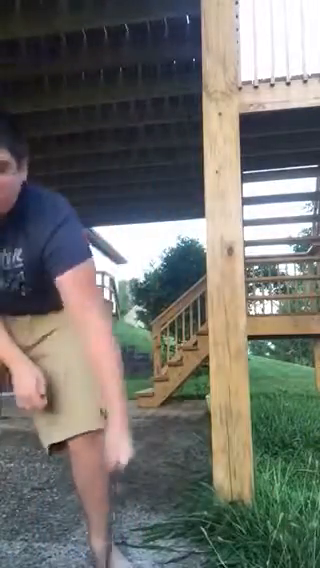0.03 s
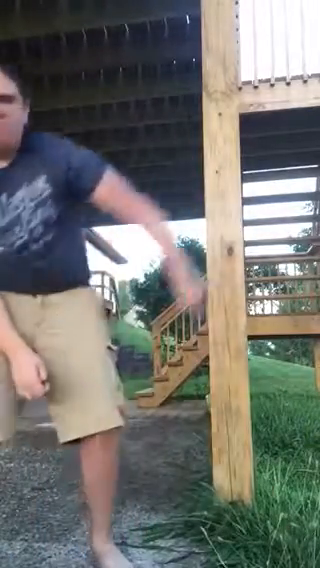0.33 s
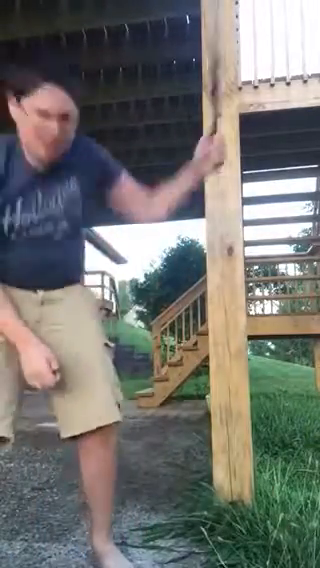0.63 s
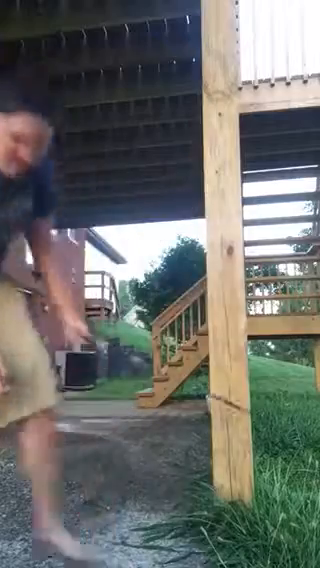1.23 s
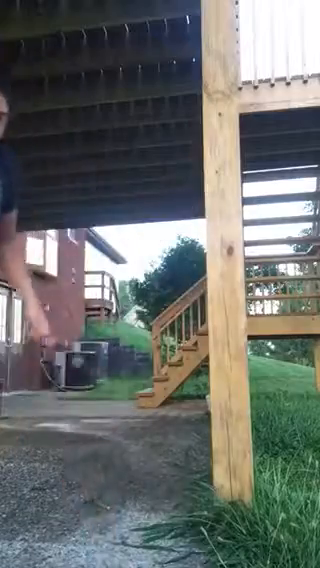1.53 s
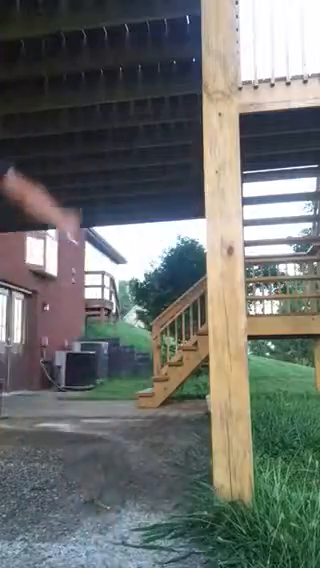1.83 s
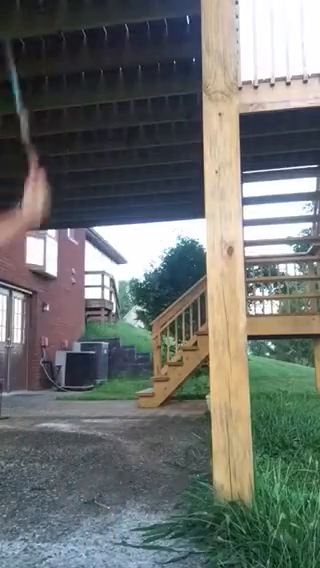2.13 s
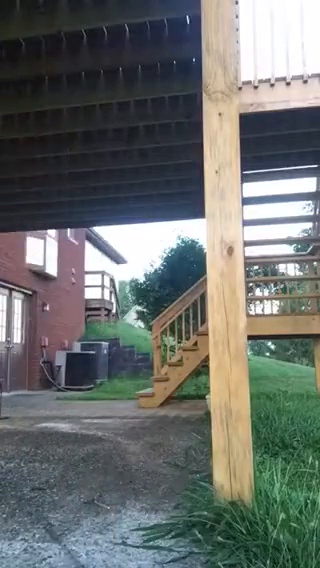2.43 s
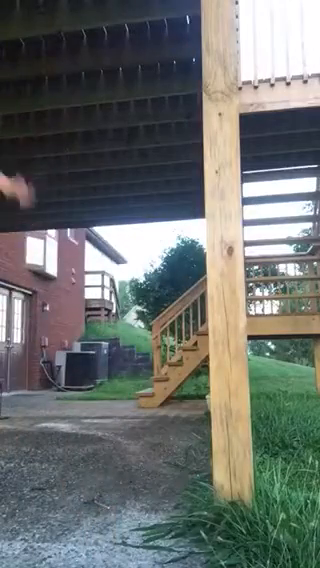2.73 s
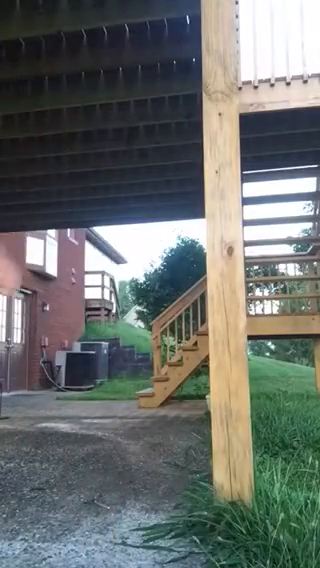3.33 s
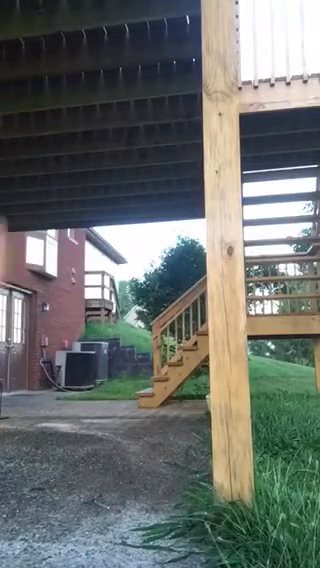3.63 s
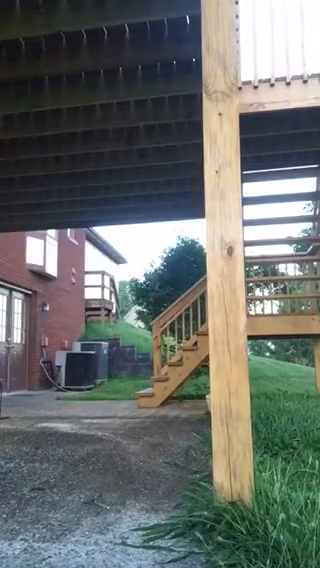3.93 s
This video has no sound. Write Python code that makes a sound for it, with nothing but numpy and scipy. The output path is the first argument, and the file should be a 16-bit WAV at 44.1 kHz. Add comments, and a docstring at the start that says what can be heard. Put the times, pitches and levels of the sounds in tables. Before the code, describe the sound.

A thin rod cracks against a wooden post five times, each hit led by a brief whoosh. The first is loudest, with a woody ring. Short echoes bounce under a deck while an air conditioner hums faintly.

```python
"""A brief whoosh ends in a sharp crack: a thin rod strikes a wooden post under a deck, five times in all.
The first blow lands squarely and rings the post's modes; ground, joists and house wall reflect each crack.
The moving rod stirs the air, and faint handling ticks fall between swings. Behind them an air
conditioner hums in the yard, with a thin shrill and a light breeze. A limiter ducks after loud cracks."""
import sys
import numpy as np
from scipy import signal
from scipy.fft import rfft, irfft, next_fast_len
from scipy.io import wavfile
from scipy.ndimage import uniform_filter1d, minimum_filter1d, map_coordinates

SR = 44100
rng = np.random.default_rng(int(sys.argv[2]) if len(sys.argv) > 2 else 0)


def log_audio(samples):
    """Write samples as a 16-bit WAV file to the path given in sys.argv[1]."""
    # one column per channel
    frames = np.atleast_2d(samples).T
    # limit to full scale, then quantise
    limited = np.clip(frames, -1, 1)
    pcm = np.round(limited * 32767).astype(np.int16)
    wavfile.write(sys.argv[1], SR, pcm)


N = 176400

# The five blows: t/s, crack level/dB, echo level/dB re crack, post ring level/dB, knock level/dB,
# whoosh level/dB, tip hiss level/dB re whoosh
BLOWS = [(0.0816, 1, -7, 2.5, -3, -38, 3), (.930, -8, -12.5, -46, -19.5, -26.5, -17),
         (2.366, -5.5, -1.5, -42, -39, -27.5, -13), (3.073, -4, -1.5, -35, -31, -25, -15.5),
         (3.819, -4.5, -0.5, -42, -30, -28, -12)]


def cracks():
    """Impact noise: a burst of spiky micro-contacts, whose early reflections add to it in power."""
    contact_spectrum = [(88, -44), (150, -3), (445, -12), (681, -13.5), (912, -12.5), (1060, -4.5),
                        (1270, -31), (1870, -9), (2760, -3), (3350, -4), (3690, -4.5), (4930, -2),
                        (5990, 3), (6470, 1.5), (7000, -1), (12800, -3), (15500, -5.5)]  # f/Hz, relative spectral level/dB
    reflections = [(0.0123, -0.5), (0.0226, -3), (.039, -11)]  # from deck and walls: delay t/s, relative level/dB
    spikes = rng.standard_normal(N)
    spikes *= np.exp(0.4 * rng.standard_normal(N // 8 + 1).repeat(8)[:N])  # a new strength every 8 samples
    grain = unit(filtered(spikes, lambda hz: amp(along(contact_spectrum, hz)) * rod_colour(hz)))
    power = np.zeros(N)
    for s, db, echo_db, *_ in BLOWS:
        power += (amp(db) * slap(s)) ** 2
        for delay, loss_db in reflections:
            power += (amp(db + echo_db + loss_db) * slap(s + delay)) ** 2
    return grain * np.sqrt(power)


def slap(s, hold_s=0.0043, t60_s=0.026):
    """Contact time: the envelope holds while the rod slaps along its length, then falls as it lets go."""
    t = clock() - s
    return (t >= 0) * amp(-60 * np.maximum(t - hold_s, 0) / t60_s)


def rod_colour(hz, half_width_hz=20):
    """Resonance: narrow peaks at the ringing partials, and one notch, colour every crack."""
    partials = [(2000, 8), (2860, 6), (3645, 6), (4527, 6), (5932, 4.5), (6191, -10.5), (6683, 2),
                (6972, 2.5), (7204, 9), (7597, 4), (8360, 3.5), (8660, 12), (8847, 7), (9147, 11),
                (9877, 6), (11811, 10)]  # f/Hz, relative level/dB
    return 1 + sum((amp(db) - 1) / (1 + ((hz - centre) / half_width_hz) ** 2) for centre, db in partials)


def deck_reverberation(gain_db=-2.5, rise_s=0.0021):
    """Reverberation: a diffuse field decays between joists and ground, the treble first."""
    bass_spectrum = [(100, -42), (600, -12)]  # f/Hz, relative spectral level/dB
    upper_spectrum = [(710, -44), (1200, -18), (1460, -23), (1880, -12), (2830, -2), (3460, -6.5),
                      (5040, -9), (6110, -1), (7570, -9), (9680, -6.5), (15500, -14)]  # f/Hz, relative spectral level/dB
    decay_times = [(300, 0.34), (3000, 0.31), (7000, 0.28), (15000, 0.23)]  # f/Hz, T60/s
    out = np.zeros(N + SR)
    diffuse = unit(filtered(noise(bass_spectrum + upper_spectrum), rod_colour))
    for (s, db, echo_db, *_), piece in zip(BLOWS, np.array_split(diffuse, len(BLOWS))):
        hz, t, spectra = signal.stft(piece, SR, nperseg=256)
        decay = amp(-60 * t / along(decay_times, hz)[:, None])
        tail = signal.istft(spectra * decay, SR)[1]
        rise = 1 - np.exp(-np.arange(len(tail)) / SR / rise_s)
        out[round(s * SR):][:len(tail)] += amp(db + echo_db + gain_db) * rise * tail
    return out[:N]


def post(lag_s=0.00296, rise_s=0.0021, knock_t60_s=0.17):
    """Free vibration: damped bending modes ring and dense upper modes knock, most on a square blow."""
    modes = [(362, -10, .24), (709, 0, .23), (963, -16, .24), (42, -7, .08), (104, -16, .2),
             (215, -16, .15), (253, -11, .14), (290, -5, .1), (535, -24, .25), (770, -12, .08),
             (861, -10, .09), (925, -13, .1)]  # f/Hz, relative level/dB, T60/s
    knock_spectrum = [(100, 11), (400, 0.5), (1000, -5.5), (1400, -14), (2000, -2), (3000, 3), (5000, -13),
                      (15000, -35)]  # f/Hz, relative spectral level/dB
    out, knocks = np.zeros(N + SR), np.zeros(N)
    t = np.arange(SR // 2) / SR
    ring = sum(amp(db - 60 * t / t60) * np.sin(2 * np.pi * hz * t) for hz, db, t60 in modes)
    ring *= 1 - np.exp(-t / rise_s)
    for s, _, _, ring_db, knock_db, *_ in BLOWS:
        out[round((s + lag_s) * SR):][:len(t)] += amp(ring_db) * ring
        knocks += amp(knock_db) * struck(s, rise_s, knock_t60_s)
    return out[:N] + knocks * noise(knock_spectrum)


def swings(lead_s=0.0078, rise_s=0.026, fall_s=0.01, speed_up_s=0.042):
    """Flow noise: air rushes round the rod, louder and higher as it speeds up; the tip adds a hiss."""
    slow_spectrum = [(100, -12), (300, -6), (600, 11), (900, -7), (1300, -21.5), (2200, -8), (5000, -58),
                     (15000, -40)]  # f/Hz, relative spectral level/dB
    fast_spectrum = [(100, -53), (400, -15), (620, -0.5), (800, 6), (1080, 0.5), (1400, -21.5),
                     (2200, -15.5), (4000, -26.5), (15000, -28.5)]  # f/Hz, relative spectral level/dB
    tip_spectrum = [(600, -27), (1200, -3), (1700, -2), (2400, -4.5), (3500, -12.5), (8000, -17),
                    (15000, -18)]  # f/Hz, relative spectral level/dB
    slow, fast, tip = noise(slow_spectrum), noise(fast_spectrum), noise(tip_spectrum)
    out = np.zeros(N)
    for s, *_, db, tip_db in BLOWS:
        t = clock() - s + lead_s
        swell = np.exp(-np.abs(t / np.where(t < 0, rise_s, fall_s)) ** 1.25)
        speed = np.clip(1 + t / speed_up_s, 0, 1)
        out += amp(db) * swell * (np.sqrt(1 - speed) * slow + np.sqrt(speed) * fast)
        out += amp(db + tip_db) * gaussian(s - 0.019, half_width_s=0.019) * tip
    backswing = gaussian(2.74, half_width_s=0.06) * band(3050, octaves=0.25)
    return out + amp(-49.5) * backswing


def thud(s=0.93, db=-24.5, hz=103):
    """Damped oscillation: one low sinusoid makes a dull bump that coincides with the second blow."""
    return amp(db) * struck(s, rise_s=0.005, t60_s=0.22) * np.sin(2 * np.pi * hz * (clock() - s))


def handling_ticks(rise_s=0.0012):
    """Light impacts: handling the rod excites faint clicks and one woody tap, as decaying noise bands."""
    ticks = [(1.735, -47, 10100, 0.54), (3.315, -48, 14000, .3), (3.466, -47, 14000, 0.36),
             (3.622, -34, 9500, 0.26), (3.717, -39, 12000, 0.42)]  # t/s, level/dB, centre f/Hz, half-width/octaves
    tap_modes = [(1620, -4), (2180, -4), (2750, 0.5), (4200, -7), (6200, 0)]  # f/Hz, relative level/dB
    clicks = sum(amp(db) * struck(s, rise_s, t60_s=0.2) * band(hz, width) for s, db, hz, width in ticks)
    wood = unit(sum(amp(db) * band(hz, octaves=0.13) for hz, db in tap_modes))
    tap = amp(-36.5) * struck(3.623, rise_s, t60_s=0.29) * wood
    return clicks + tap


def air_conditioner(hum_hz=53.64, drift=0.0032):
    """Harmonic series over flow noise: the machine's wavering hum, with the rush of fan and outdoor air."""
    harmonics = [(1, -33), (2, -49.5), (3, -53.5), (4, -54), (5, -52.5), (8, -55), (12, -60)]  # harmonic number, level/dB
    air_spectrum = [(76, -14), (130, -12), (156, -3.5), (183, -5.5), (219, 4.5), (242, 0), (273, 1),
                    (289, -1), (391, -5.5), (440, 1.5), (487, -5.5), (583, -2.5), (698, -3), (819, -7.5),
                    (905, -5), (1250, -19.5), (1650, -15.5), (1900, -16), (2670, -14), (3070, -19),
                    (4860, -22.5), (6690, -14.5), (7700, -23), (11700, -26), (15500, -31)]  # f/Hz, relative spectral level/dB
    cycles = np.cumsum(hum_hz * (1 + drift * wobble(3.11))) / SR
    hum = np.zeros(N)
    for k, db in harmonics:
        rms = amp(db + 0.67 * np.sqrt(k) * wobble(4.82))
        hum += rms * np.sqrt(2) * np.sin(2 * np.pi * (round(k) * cycles + rng.random()))
    air = amp(-40.5) * noise([(40, -12)] + air_spectrum)
    low_air = filtered(air, lambda hz: 1 / (1 + (hz / 1000) ** 4))
    flutter = amp(1.6 * wobble(12)) - 1
    return hum + air + flutter * low_air


def shrill(hz=6870, db=-58.5):
    """Narrow-band noise: a faint, nearly steady pitch, like far insects."""
    return amp(db + 1.5 * wobble(3)) * band(hz, octaves=0.044)


def breeze():
    """Turbulent pressure: a light breeze on the microphone makes a low, uneven rumble."""
    gusts = [(0, -46), (1.48, -52.5), (1.6, -37.5), (1.76, -42), (1.95, -43), (2.198, -43), (2.4, -44),
             (4, -50)]  # t/s, level/dB
    rumble_spectrum = [(10, -14), (32, 1.5), (50, 0), (90, -7), (130, -27), (300, -61)]  # f/Hz, relative spectral level/dB
    level_db = np.interp(clock(), *np.transpose(gusts)) + 2 * wobble(10)
    return amp(level_db) * noise(rumble_spectrum)


def amp(db):
    """Amplitude ratio of a level in decibels."""
    return 10 ** (np.asarray(db) / 20)


def unit(x):
    """Normalisation to rms 1."""
    return x / np.sqrt(np.mean(x ** 2) + 1e-20)


def along(points, hz):
    """Interpolation of (f/Hz, value) points on a logarithmic frequency axis."""
    f, values = np.transpose(points)
    return np.interp(np.log(hz + 1), np.log(f + 1), values)


def clock():
    """Time t/s at each sample."""
    return np.arange(N) / SR


def wobble(rate):
    """Random modulation: a smooth curve with rate knots a second."""
    return map_coordinates(rng.standard_normal(int(N * rate / SR) + 4), [clock() * rate])


def filtered(x, response):
    """Linear filtering: the spectrum of x times a frequency response."""
    size = next_fast_len(N + 8192)
    return irfft(rfft(x, size) * response(np.fft.rfftfreq(size, 1 / SR)), size)[:N]


def noise(spectrum):
    """Coloured noise of rms 1, shaped by (f/Hz, level/dB) points."""
    return unit(filtered(rng.standard_normal(N), lambda hz: amp(along(spectrum, hz))))


def band(centre_hz, octaves):
    """Band-pass noise of rms 1; the amplitude halves at the given octaves from the centre."""
    white = rng.standard_normal(N)
    return unit(filtered(white, lambda hz: 1 / (1 + (np.log2((hz + 1) / centre_hz) / octaves) ** 2)))


def struck(s, rise_s, t60_s):
    """Exponential damping: an envelope that starts at s, rises and dies away."""
    t = np.maximum(clock() - s, 0)
    return (1 - np.exp(-t / rise_s)) * amp(-60 * t / t60_s)


def gaussian(s, half_width_s):
    """A Gaussian envelope that peaks at s and falls to 1/e a half-width away."""
    return np.exp(-((clock() - s) / half_width_s) ** 2)


def scene():
    """Superposition: all sources add at one microphone."""
    blows = cracks() + deck_reverberation() + post() + thud() + swings()
    return (blows + handling_ticks() + air_conditioner() + shrill() + breeze())[None]


def record(dry, limit_db=-7, hold_s=0.18, release_s=0.053, ceiling=0.8, top_hz=15800):
    """Limiting: the gain ducks at once, holds and recovers; soft clipping and a low-pass follow."""
    x = dry[0]
    level_db = 10 * np.log10(np.abs(uniform_filter1d(x ** 2, size=90)) + 1e-12)
    needed_gain_db = np.minimum(limit_db - level_db, 0)
    half_hold = int(hold_s * SR / 2)
    held_db = -minimum_filter1d(needed_gain_db, 2 * half_hold + 1, origin=half_hold, mode="constant")
    recovery = np.exp(clock() / release_s)
    duck_db = np.maximum.accumulate(held_db * recovery) / recovery  # each dip relaxes exponentially
    x = x * amp(-uniform_filter1d(duck_db, size=45))
    x = x / (1 + np.abs(x / ceiling) ** 6) ** (1 / 6)  # peaks round off
    return filtered(x, lambda hz: hz < top_hz)[None]


dry = scene()
out = record(dry)
log_audio(out)
```